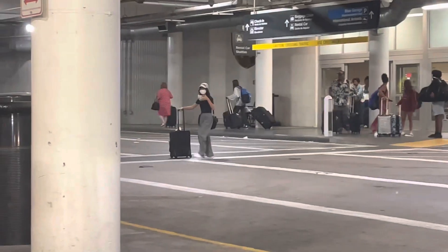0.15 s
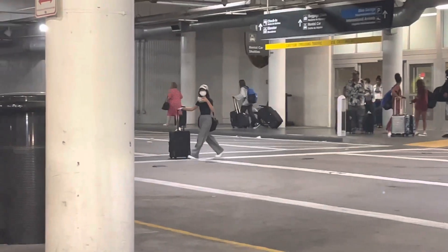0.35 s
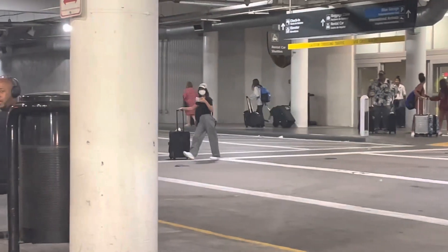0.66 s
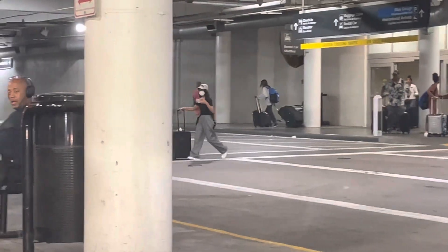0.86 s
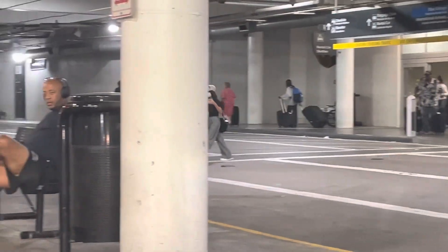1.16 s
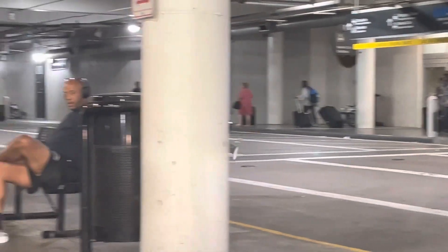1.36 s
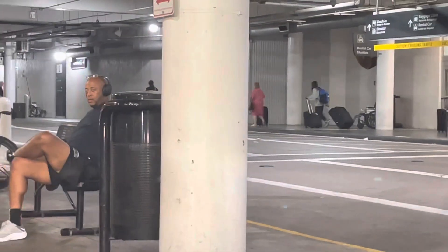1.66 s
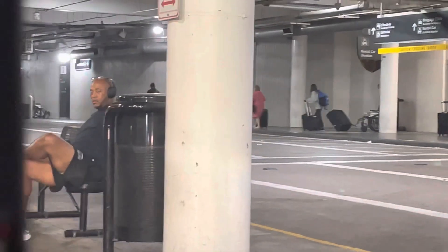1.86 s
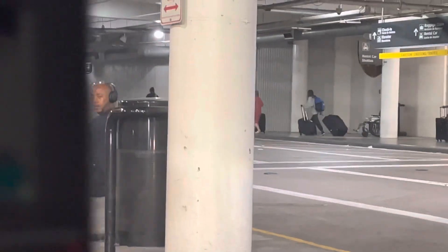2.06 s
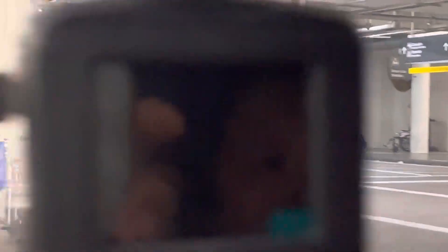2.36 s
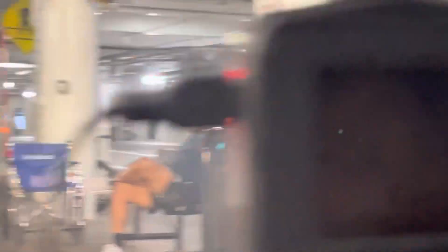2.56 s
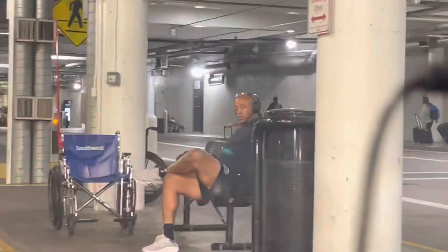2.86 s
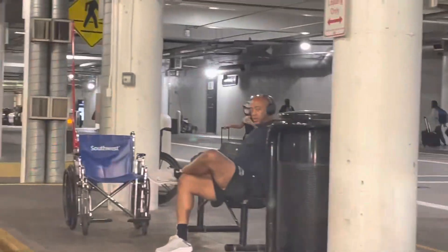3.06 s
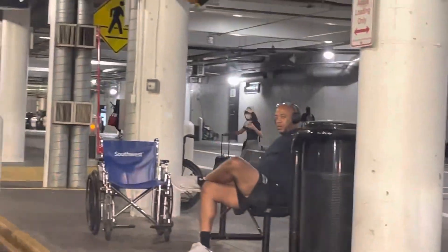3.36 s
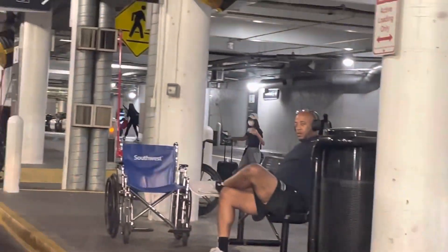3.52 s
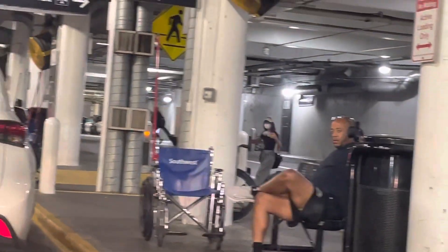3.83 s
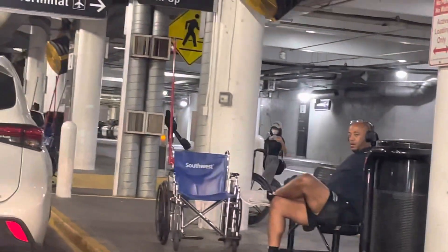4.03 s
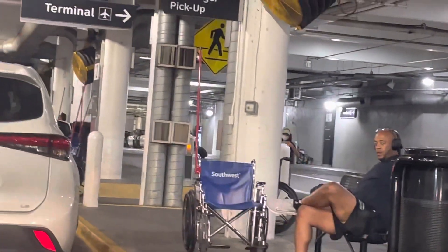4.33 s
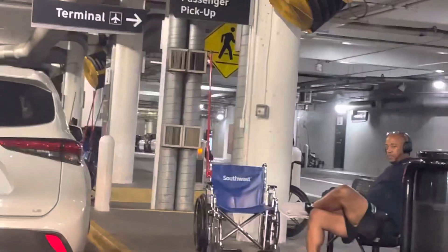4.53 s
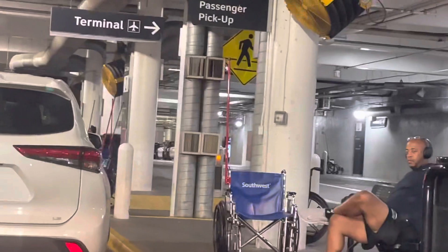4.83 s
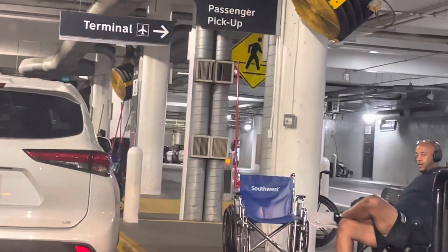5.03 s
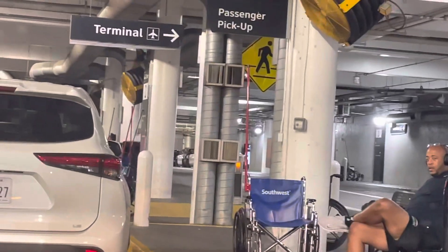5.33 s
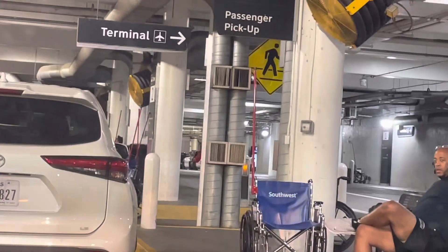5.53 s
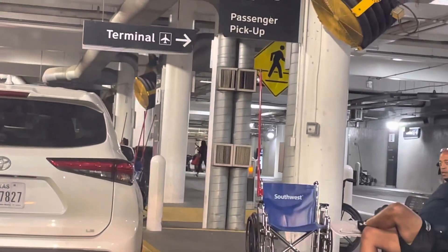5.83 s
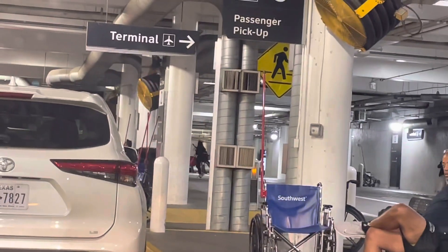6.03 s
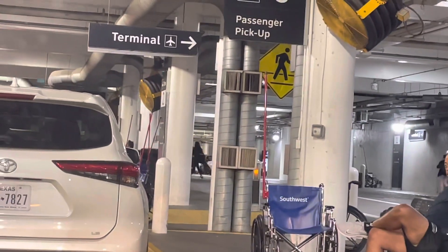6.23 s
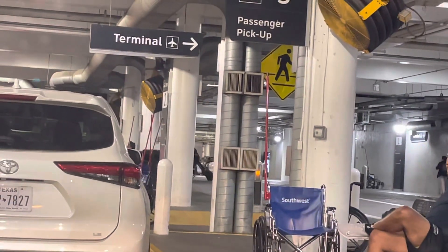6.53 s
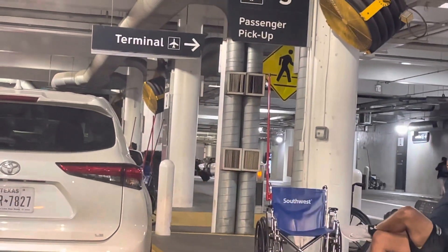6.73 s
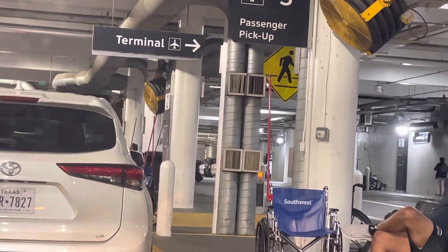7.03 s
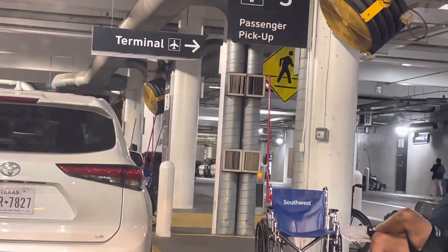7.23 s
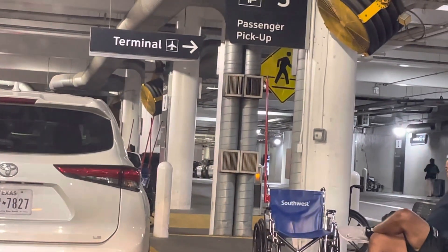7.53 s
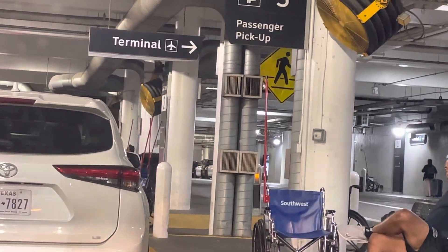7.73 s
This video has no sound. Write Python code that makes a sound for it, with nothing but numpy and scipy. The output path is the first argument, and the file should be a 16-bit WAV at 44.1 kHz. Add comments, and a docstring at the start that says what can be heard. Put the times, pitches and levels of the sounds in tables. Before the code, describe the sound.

Low, heavy, bass-dominated cabin rumble runs throughout, slowly growing, made of idling engine, ventilation and distant traffic heard through glass. Handheld phone microphone picks up soft hollow taps and finger slides on plastic in the first half, with the loudest knock around the middle. The second half brings dry fabric rubbing and brittle crinkles, with a bright burst of cracks, then scattered small ticks to the end.

```python
"""Inside a parked car in a concrete garage: an engine idles while fans and traffic drone through the glass.
The engine and fan hums are drifting, wavering sine tones; the roar is coloured noise.
A hand taps dully on the plastic trim (fading tones) and slides over it (noise around the trim's tones).
Cloth rubs near the phone (grainy noise) and something crinkles and snaps (short bursts and ringing).
The phone's two ports share the bass and drift out of step in the treble."""
import sys
import numpy as np
from scipy import signal
from scipy.fft import rfft, irfft, next_fast_len
from scipy.io import wavfile
from scipy.ndimage import uniform_filter1d, map_coordinates

SR = 44100
rng = np.random.default_rng(int(sys.argv[2]) if len(sys.argv) > 2 else 0)


def transcribe(u):
    """Save the signal u as a 16-bit wav file named by the first command-line argument.

    u: samples, shape (n,) or (channels, n), limited to [-1, 1]; the rate is SR.
    q: integer samples, one column per channel.
    """
    v = np.clip(np.atleast_2d(u).T, -1, 1)
    q = np.round(v * 32767).astype(np.int16)
    wavfile.write(sys.argv[1], SR, q)


def field_ratio(decibels):
    """Amplitude ratio for a level in dB (20 dB per decade); scalars and array-likes work."""
    return 10 ** (np.asarray(decibels, dtype=float) / 20)


N = 347508  # length in samples

# The ways the plastic trim likes to shake. Each row: pitch in Hz, time to fade by 60 dB in seconds.
TRIM_MODES = [(540, 0.033), (750, 0.018), (1020, 0.02)]


def unit(x):
    """Scale to an rms (average strength) of 1."""
    return x / np.sqrt(np.mean(x ** 2) + 1e-20)


def along(points, hz):
    """Read a curve of (Hz, value) points at any frequency, on a log axis."""
    point_hz, values = np.transpose(points)
    return np.interp(np.log(hz + 1), np.log(point_hz + 1), values)


def curves(rows):
    """One value per sample for each column after the time."""
    seconds, *columns = np.transpose(rows)
    return [np.interp(np.arange(N) / SR, seconds, column) for column in columns]


def wobble(rate):
    """A smooth random curve through about `rate` random points a second."""
    knots = rng.standard_normal(int(N * rate / SR) + 4)
    return map_coordinates(knots, [np.arange(N) * rate / SR])


def fade(t, t60):
    """A ringing thing loses 60 dB in every t60 seconds."""
    return field_ratio(-60 * t / t60)


def press(t, seconds):
    """A soft start: the force builds up over about this many seconds."""
    return 1 - np.exp(-t / seconds)


def sine(hz, t):
    """A pure tone of steady pitch."""
    return np.sin(2 * np.pi * hz * t)


def filtered(x, response):
    """Multiply the spectrum of x by a response, given as a function of frequency."""
    size = next_fast_len(x.shape[-1] + 8192)
    spectrum = rfft(x, size) * response(np.fft.rfftfreq(size, 1 / SR))
    return irfft(spectrum, size)[..., :x.shape[-1]]


def peak(f, hz, width):
    """One resonance: strongest at hz, weaker on both sides."""
    return 1j * f * width / (hz * hz - f * f + 1j * f * width)


def noise(gain):
    """Two unrelated noises, coloured by gain and scaled to rms 1."""
    return unit(filtered(rng.standard_normal((2, N)), gain))


def patchy(x, depth_db, size):
    """Make narrow patches of colour come and go in a noise."""
    spectrogram = signal.stft(x, nperseg=size)[2]
    field = rng.standard_normal(spectrogram.shape[1:])
    field = uniform_filter1d(field, size=2, axis=0)
    field = uniform_filter1d(field, size=10, axis=1)
    return unit(signal.istft(spectrogram * field_ratio(depth_db * unit(field)), nperseg=size)[1][:, :N])


def ports(pair):
    """Mix two versions of a sound so that left and right are as alike as the ports hear them."""
    # Each row: frequency in Hz, likeness of left and right (1 or more = the same, 0 = unrelated).
    likeness = [(60, 0.92), (200, 0.95), (400, 0.9), (750, 0.69), (1300, 0.4), (2200, 0.8), (2900, 1.07),
                (6000, 0.98), (7300, 0.3), (7800, 0.94), (8700, 0.99), (9300, 0.5), (12000, 1),
                (15000, 0.94)]
    turn = lambda f: np.arccos(np.clip(along(likeness, f), 0, 1)) / 2
    mid, side = filtered(pair, lambda f: np.array([np.cos(turn(f)), np.sin(turn(f))]))
    return np.array([mid + side, mid - side])


def garage():
    """Traffic roar and duct resonances are noise; fan hum, cabin boom and a thin whine are drifting tones."""
    # Colour of the roar through the glass. Each row: frequency in Hz, relative level in dB.
    roar_colour = [(15, -36), (30, -26.5), (45, -7.5), (60, -6), (95, -14.5), (115, -16), (150, -16),
                   (250, -17), (480, -22.5), (650, -32), (800, -36), (1500, -50.5), (3900, -66),
                   (4600, -73), (8500, -93.5), (15500, -86)]
    # Duct resonances. Each row: pitch in Hz, width in Hz, level in dB.
    duct_rows = [(114.3, 15, -41), (190.67, 6, -48), (41.6, 25, -39)]
    # Random wavering of the fan hum, as in a narrow noise.
    # Each row: crest in seconds, level in dB, width in seconds.
    hum_wavers = [(.58, -31.5, 0.057), (1.1, -35, 0.14), (1.9, -32.5, 0.058), (2.14, -37.5, 0.063),
                  (2.6, -39, 0.16), (2.93, -36, 0.091), (3.32, -35.5, 0.091), (3.62, -34, 0.15),
                  (4.24, -40.5, 0.1), (4.66, -33.5, 0.2), (5.16, -33, 0.066), (5.4, -35.5, 0.13),
                  (6.1, -36.5, 0.3), (6.76, -32, 0.15), (7.24, -35.5, 0.11)]
    # Two close tones trade strength. Each row: time in seconds, lower tone in dB, upper tone in dB.
    whine_levels = [(0, -88, -97), (.4, -87, -85), (1, -87, -85), (2.35, -88, -87), (2.45, -82, -94),
                    (2.7, -82, -84), (3.05, -82, -86), (3.2, -92, -90), (3.45, -81, -89), (4.02, -81, -90),
                    (4.12, -110, -110)]
    t = np.arange(N) / SR

    def hum(hz, drift):
        """A tone of rms 1 whose pitch drifts by about `drift` Hz."""
        return np.sqrt(2) * np.sin(2 * np.pi * np.cumsum(hz + drift * wobble(4.5)) / SR)

    roar_db = -33 + 0.15 * t + 0.77 * wobble(8.2)  # grows slowly
    roar = field_ratio(roar_db) * patchy(noise(lambda f: field_ratio(along(roar_colour, f))), depth_db=1.9, size=2048)
    ducts = sum(field_ratio(db) * noise(lambda f: peak(f, hz, width) ** 2) for hz, width, db in duct_rows)
    electronics = field_ratio(-101) * noise(lambda f: peak(f, 12000, 160) ** 2)  # faint narrow hiss
    fan_level = sum(field_ratio(db) * np.exp(-((t - crest) / width) ** 2) for crest, db, width in hum_wavers)
    fan = fan_level * hum(129.9, drift=1.5)
    boom = field_ratio(-38.5 + 1.5 * np.tanh(wobble(5.1))) * hum(67.9, drift=2.2)
    whine = sum(field_ratio(db + 2.5 * wobble(12)) * hum(hz, drift=1.5)
                for hz, db in zip((3650, 3682), curves(whine_levels)))
    return ports(roar + ducts + electronics) + whine + fan + boom


def engine():
    """Firing pulses make tones at multiples of the idle rate, felt through the body and alike on both ports."""
    # Wavering level of the firing tone at twice the idle rate. Each row: time in seconds, level in dB.
    firing_level = [(0.0, -31.5), (0.09, -27), (0.99, -30), (1.56, -26.5), (2.72, -33), (2.81, -29),
                    (4.1, -25.5), (4.39, -30), (4.76, -29), (5.05, -30), (5.16, -25), (5.27, -30.5),
                    (5.99, -24.5), (6.12, -30.5), (6.89, -30.5), (6.96, -25.5), (7.84, -32), (7.88, -20.5)]
    # Weaker tones. Each row: multiple of the idle rate, middle level in dB.
    side_orders = [(1, -49), (4 / 3, -52), (5 / 3, -46), (4, -50)]
    idle_hz, drift_hz = 25.5, 0.1222
    turn = 2 * np.pi * np.cumsum(idle_hz + drift_hz * wobble(1.57)) / SR

    def tone(multiple, db):
        start_phase = rng.uniform(0, 2 * np.pi)
        return np.sqrt(2) * field_ratio(db) * np.sin(multiple * turn + start_phase)

    firing_db, = curves(firing_level)
    waver_db = firing_db - firing_db.mean()
    third_db = -35.5 + 0.29 * waver_db + 0.5 * np.tanh(wobble(7.3))  # shares some of this wavering
    weak = sum(tone(multiple, db + 1.1 * wobble(3.5)) for multiple, db in side_orders)
    return tone(2, firing_db) + tone(3, third_db) + weak


def cloth():
    """Fibres slip in dense tiny grains; every stroke rises, holds and dies away at the same rates."""
    # Each row: start of the hold in seconds, hold in seconds, body in dB, sheen over body in dB.
    strokes = [(0.993, 0.08, -65, -3.5), (1.248, 0.027, -71.5, -9.5), (2.876, .55, -77.5, -15),
               (4.04, .08, -71, -2.5), (4.131, 0.035, -65, -3.5), (4.3, 0.32, -64.5, -7),
               (4.736, 0.054, -71.5, -4), (4.863, .1, -67, -8), (5.046, 0.12, -71.5, -12.5),
               (5.362, .13, -70, -5.5), (5.557, 0.026, -63.5, -3), (5.676, 0.034, -64.5, -0.5),
               (5.953, 0.16, -62.5, -10.5), (6.248, 0.19, -63.5, -6.5), (6.44, 0.031, -60.5, -5),
               (6.56, 0.33, -60.5, -11), (6.98, 0.018, -66.5, -6), (7.063, 0.027, -62, -7),
               (7.142, 0.065, -66.5, -5), (7.263, 0.023, -62.5, -8), (7.322, 0.012, -66, -4.5),
               (7.478, 0.078, -72, -3.5), (7.58, 0.11, -64, -5), (7.733, 0.035, -67.5, -6.5),
               (7.874, .06, -54.5, -11.5)]
    # Colour of the body of the rub. Each row: frequency in Hz, relative level in dB.
    weave = [(700, -16), (1500, -16.5), (2100, 1), (2800, -1.5), (3500, -1.5), (4300, -3.5), (6500, -7),
             (9000, -17.5), (15500, -41)]
    # Colour of its bright edge, the sheen. Each row: frequency in Hz, relative level in dB.
    sheen_colour = [(4000, -24), (6500, -3), (8000, 0), (9600, -1), (11000, -6), (13500, -8), (14300, -12),
                    (15700, -16)]
    # Small cavities near the ports. Each row: pitch in Hz, width in Hz, added amount in dB.
    cavity_rows = [(1970, 73, 2), (2290, 160, -1.5), (3590, 120, -3.5), (4500, 220, -6.5),
                   (5200, 110, -3.5), (5650, 97, -3), (6800, 200, -2.5)]
    rise_db_per_s, fall_db_per_s = 111.5, 93
    t = np.arange(N) / SR

    def rub_power(start, hold, db):
        rise = rise_db_per_s * np.clip(start - t, 0, 9)
        fall = fall_db_per_s * np.clip(t - start - hold, 0, 9)
        return field_ratio(db - rise - fall) ** 2

    # the first term of each sum is the cloth at rest
    body_power = field_ratio(-86) ** 2 + sum(rub_power(s, hold, db) for s, hold, db, _ in strokes)
    sheen_power = field_ratio(-92) ** 2 + sum(rub_power(s, hold, db + over) for s, hold, db, over in strokes)
    cavities = lambda f: 1 + sum(field_ratio(db) * abs(peak(f, hz, width)) ** 2 for hz, width, db in cavity_rows)
    grit = field_ratio(0.9 * wobble(60) + 1.4 * wobble(400))
    body = patchy(noise(lambda f: field_ratio(along(weave, f)) * cavities(f)), depth_db=2.2, size=512)
    sheen = patchy(noise(lambda f: field_ratio(along(sheen_colour, f))), depth_db=2.6, size=512)
    return ports(grit * (np.sqrt(body_power) * body + np.sqrt(sheen_power) * sheen))


def slides():
    """Skin catches unevenly on the trim and shakes its two upper modes."""
    # Fingers sliding over the trim. Each row: start in seconds, end in seconds, level in dB.
    slide_rows = [(1.6, 1.977, -57), (2.196, 2.468, -52), (2.83, 3.365, -54.5), (5.02, 5.3, -64.5)]
    edge_s, lumps_db = 0.023, 4.5
    t = np.arange(N) / SR
    touch = sum(field_ratio(db) * np.clip(np.minimum(t - start, end - t) / edge_s, 0, 1)
                for start, end, db in slide_rows)
    rings = [field_ratio(lumps_db * wobble(35)) * noise(lambda f: peak(f, hz, 0.18 * hz) ** 2)
             for hz, _ in TRIM_MODES[1:]]
    return ports(touch * unit(sum(rings)))


def snaps():
    """Something bends and lets go: a gritty burst over a broad crackle rings the modes near its pitch."""
    # Crinkles and snaps. Each row: start in seconds, strength in dB, time for the burst to fade by 60 dB
    # in seconds, pitch in Hz, hardness in dB.
    snap_rows = [(1.04, -55, .2, 2470, -6), (1.254, -55, 0.16, 2520, -13.5),
                 (2.412, -41.5, 0.033, 2860, -13), (2.4129, -43, 0.024, 1750, -21.5),
                 (2.42, -58.5, 0.18, 4170, -22), (2.550, -50, .03, 2600, -21),
                 (2.551, -56.5, 0.025, 4980, -22), (2.553, -51.5, 0.025, 1800, -25),
                 (2.558, -63, 0.091, 4500, -20), (4.304, -51, .1, 3970, -16.5),
                 (4.308, -44.5, 0.082, 2170, -15), (4.397, -51.5, .04, 3500, -15),
                 (4.433, -43, 0.016, 2200, -9), (4.433, -48.5, 0.015, 5530, -2.5),
                 (4.466, -44.5, 0.018, 2370, -14.5), (4.6825, -50.5, 0.024, 4550, -5),
                 (4.683, -51.5, 0.018, 2600, -15.5), (5.523, -40, 0.045, 2450, -9.5),
                 (5.551, -38, 0.11, 2330, 0.5), (5.876, -47, 0.12, 5400, -3),
                 (5.882, -34.5, 0.056, 3640, 1), (5.894, -24.5, 0.12, 3700, 1),
                 (5.9068, -16.5, 0.037, 5960, 6.5), (5.907, -24, 0.031, 3626, 2),
                 (5.908, -28.5, .08, 2600, 4), (5.915, -28, 0.063, 1340, 8), (5.923, -31.5, 0.047, 1240, 8),
                 (5.926, -41.5, 0.043, 13900, 9), (5.943, -37.5, 0.048, 2600, -1),
                 (5.954, -36.5, 0.067, 1230, 7), (5.957, -50.5, 0.027, 1990, 22.5),
                 (5.9553, -43.5, 0.031, 3550, 6), (6.0128, -32, 0.054, 2640, 10),
                 (6.069, -37, 0.052, 3550, 0.5), (6.0789, -26.5, 0.06, 1246, 5.5),
                 (6.081, -37.5, .04, 2600, 5.5), (6.082, -37.5, .02, 12430, 5),
                 (6.0852, -33, 0.047, 1330, 12), (6.136, -47, 0.065, 2480, -14),
                 (6.458, -49, 0.055, 2201, -14), (6.621, -54.5, 0.33, 3420, -1),
                 (6.69, -51, 0.35, 3550, -8.5), (6.981, -47, 0.064, 5440, 3.5),
                 (7.005, -53, 0.09, 1980, 16), (7.045, -48.5, .15, 6750, -8),
                 (7.281, -42.5, 0.08, 2070, -4.5), (7.314, -47.5, 0.12, 2330, -0.5),
                 (7.338, -44, .15, 2300, -4), (7.667, -42, .05, 6830, 9), (7.721, -46.5, 0.15, 2280, -12.5),
                 (7.818, -54, 0.26, 4500, -8), (7.856, -48, .15, 2400, -13)]
    # Modes of the thing that snaps. Each row: pitch in Hz, time to fade by 60 dB in seconds, level in dB.
    wrap_modes = [(1182, 0.03, 0), (1450, 0.019, -4), (1990, 0.16, -13.5), (2600, 0.04, -7.5),
                  (3550, 0.035, -11), (4750, 0.044, -11), (5400, 0.077, -15.5), (6060, 0.014, -14.5),
                  (7250, 0.03, -12), (8150, 0.033, -3), (10400, 0.019, -17), (13900, .08, -16.5)]
    out, t = np.zeros((2, N + SR)), np.arange(SR // 4) / SR

    def body(f):
        """The grit keeps shaking the same modes while it lasts."""
        return 0.15 + sum(field_ratio(level) * abs(peak(f, mode, 0.11 * mode)) ** 2 for mode, _, level in wrap_modes)

    phases = 3 * rng.standard_normal((len(snap_rows), len(wrap_modes)))
    for (s, db, t60, hz, hard_db), mode_phases in zip(snap_rows, phases):
        capped_db = min(hard_db, 6)
        bright = field_ratio(-14.5 + 0.6 * capped_db)  # harder snaps crackle brighter

        def colour(f):
            crackle = 0.5 * peak(f, 2200, 3300) ** 2
            return peak(f, hz, 0.27 * hz) + crackle + bright * peak(f, 6700, 16000) ** 2

        grit = unit(filtered(rng.standard_normal((2, len(t))), lambda f: colour(f) * body(f)))
        burst = fade(t, t60) * grit
        # the first instant: a very short crack
        crack = unit(filtered(rng.standard_normal(len(t)), lambda f: peak(f, 7000, 14000) ** 2))
        burst += field_ratio(0.5 + capped_db) * fade(t, 0.0046) * crack
        # a brief snap also pops at its own pitch; a longer one pops less
        pop_t60 = 0.03
        burst += min(pop_t60 / t60, 1) * field_ratio(5) * fade(t, pop_t60) * sine(hz, t)
        near = lambda mode: 0.039 + abs(peak(mode, hz, 0.11 * hz))
        ring = sum(near(mode) * field_ratio(hard_db + level) * fade(t, life) * np.sin(2 * np.pi * mode * t + phase)
                   for (mode, life, level), phase in zip(wrap_modes, mode_phases))
        out[:, round(s * SR):][:, :len(t)] += field_ratio(db - 6) * press(t, 0.00082) * (burst + ring)
    return ports(out[:, :N])


def taps():
    """A fingertip sets all trim modes off together, with a thump, a faint tick and a brief cabin echo."""
    # Taps on the trim. Each row: start in seconds, strength in dB, spot on the panel (0 favours the
    # low mode, 1 the middle, 2 the high), dB a mode loses per step away from the spot.
    tap_rows = [(1.496, -39, 0.21, 9), (1.5305, -30, 0.14, 6.1), (1.581, -38.5, -0.15, 4.2),
                (1.615, -32, 0.8, 16), (1.632, -41, .9, 16), (1.686, -42, 1, 16), (1.711, -38.5, .8, 17),
                (1.722, -42, .9, 16), (1.749, -43.5, 0.34, 7.1), (1.776, -47, 2, 14),
                (1.827, -43, 0.63, 6.9), (1.841, -47, 2, 14), (1.882, -40.5, 2, 14), (1.9, -43, 1.2, 8),
                (1.952, -40.5, 0.6, 6.4), (1.978, -48.5, 2, 14), (2.062, -41, 1, 6.1),
                (2.278, -23, 1.18, 19.4), (2.357, -37, 0.56, 9.2), (2.429, -39.5, 0.9, 16),
                (2.747, -33.5, 0.26, 3.6), (2.861, -35, 1.05, 20), (2.947, -26, -0.9, 6.7),
                (3.014, -25, 0.39, 7.9), (3.028, -40, 2, 12), (3.094, -29.5, 0.49, 5.5),
                (3.114, -46, 2, 10), (3.231, -27, 0.26, 4.7), (3.271, -49, 1.9, 11), (3.283, -54, 1.9, 10),
                (3.332, -27, 0.46, 6.1), (3.351, -41, 1, 10), (3.384, -39.5, 0.16, 7.2),
                (3.4111, -15, 0.9, 15), (5.005, -23, -0.91, 3.1), (5.017, -31.5, 0.67, 13),
                (5.035, -41, -0.015, 7.9), (5.156, -46, 1.5, 7.4), (5.192, -41, 1.6, 9.9), (5.2, -47, 2, 9),
                (5.232, -42, 1.5, 11), (7.275, -32.5, -0.67, 3.3), (7.312, -37.5, 0.25, 3.9)]
    skin_s = 0.0015  # the fingertip takes about this long to press home
    detune = 0.015  # random spread of each mode's pitch, as a share of it
    out, t = np.zeros((2, N + SR)), np.arange(SR // 8) / SR
    for s, db, spot, loss_db in tap_rows:
        ring = 0
        for k, (hz, t60) in enumerate(TRIM_MODES):
            mode_hz = hz * (1 + detune * rng.standard_normal())
            mode_level = field_ratio(12.5 - loss_db * abs(k - spot))
            ring = ring + (-1) ** k * mode_level * fade(t, t60) * sine(mode_hz, t)
        # soft skin gives no treble, a small panel radiates no bass
        hit = field_ratio(db) * filtered(ring * press(t, skin_s), lambda f: peak(f, 786, 1500) ** 3)
        # the whole panel yields under a tap near its low spot
        thump_level = field_ratio(db + 4 - loss_db * abs(spot))
        hit += thump_level * fade(t, 0.031) * press(t, 0.0024) * sine(360, t)
        # the brief hard edge of a tap
        hit += field_ratio(db - 21.5) * fade(t, 0.012) * press(t, skin_s) * sine(1500, t)
        # a share of the slope of the wave makes it reach one port a little earlier
        skew = rng.choice([-1, 1]) * np.gradient(hit) * SR / (2 * np.pi * 700)
        tick_noise = filtered(rng.standard_normal(len(t)), lambda f: peak(f, 2600, 2500))
        tick = field_ratio(db - 42) * fade(t, 0.012) * tick_noise
        # the cabin answers after 4 ms
        cabin = rng.standard_normal((2, len(t))) * fade(t, 0.06) * (t > 0.004)
        cabin = cabin / np.linalg.norm(cabin[0])
        echo = signal.fftconvolve(hit[None], cabin, axes=1)[:, :len(t)]
        out[:, round(s * SR):][:, :len(t)] += np.array([hit, skew]) + tick + field_ratio(-14.5) * echo
    return ports(out[:, :N])


def scene():
    """Everything that reaches the two ports, opening over 8 milliseconds."""
    opening = np.sin(np.pi / 2 * np.clip(np.arange(N) / SR / 0.008, 0, 1)) ** 2
    return opening * (garage() + engine() + cloth() + slides() + snaps() + taps())


def low_pass(x):
    """Removes everything above the highest recorded frequency."""
    return signal.sosfilt(signal.butter(12, 15730, fs=SR, output="sos"), x)


def record(dry):
    """The two ports turn against each other in the treble, and nothing passes above 15750 Hz."""
    # Mismatch of the ports. Each row: frequency in Hz, lead of the left port in radians.
    left_lead = [(6200, 0), (7240, -1.3), (7700, -2.9), (7900, -3.13), (8700, -3.16), (8900, -3.4),
                 (9200, -4.6), (10400, -5.8), (12300, -6.4), (12900, -7), (13900, -9.3), (15500, -9.4)]
    # each port takes half of the lead, in opposite directions
    half_turns = lambda f: np.exp(0.5j * np.outer([1, -1], along(left_lead, f)))
    turned = filtered(dry, lambda f: half_turns(f) * (f < 15750))
    return low_pass(turned)


dry = scene()
out = record(dry)
transcribe(out)
```